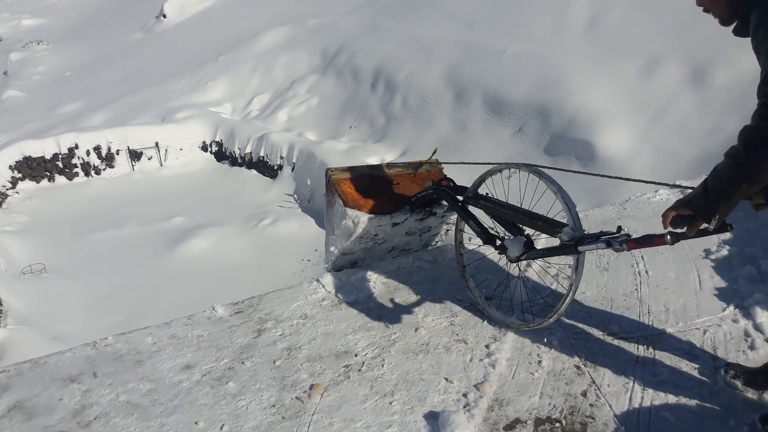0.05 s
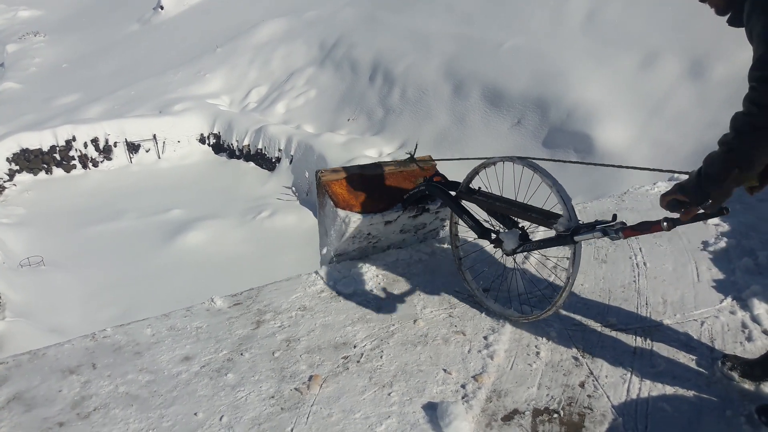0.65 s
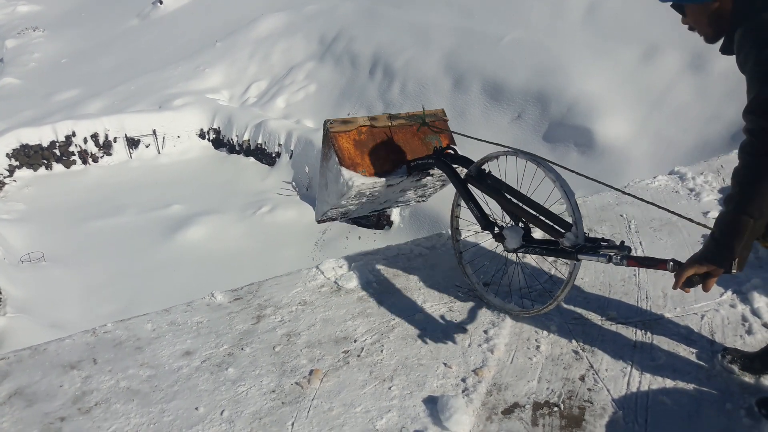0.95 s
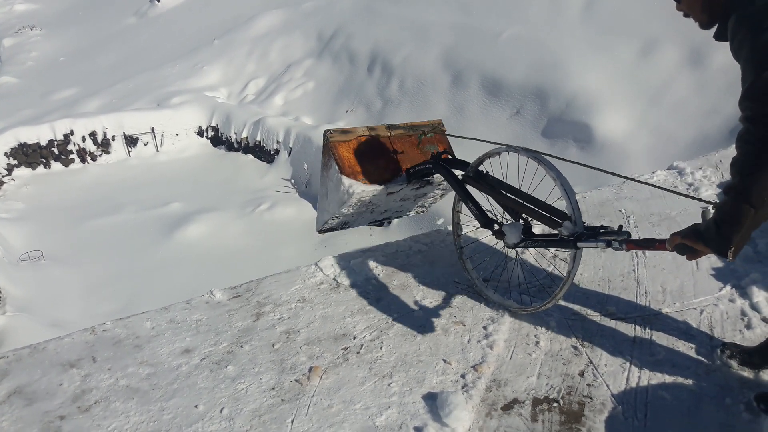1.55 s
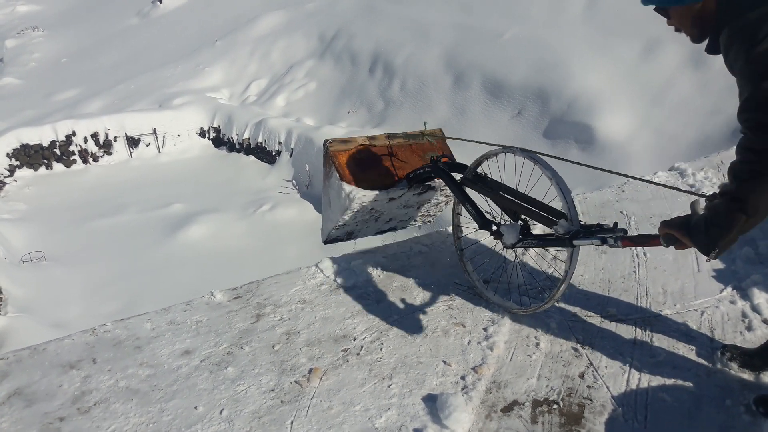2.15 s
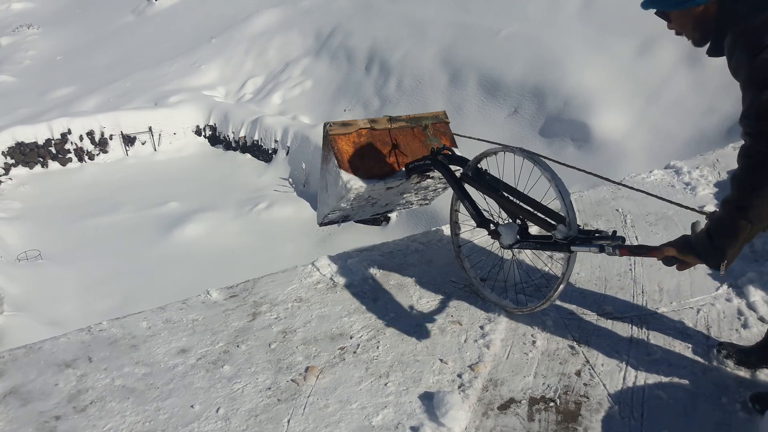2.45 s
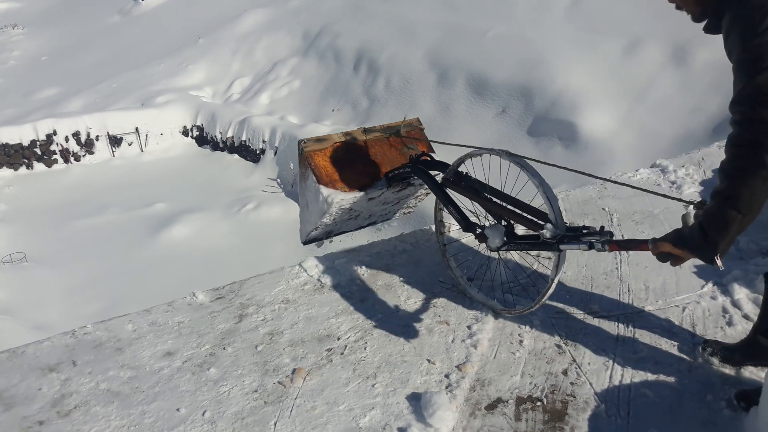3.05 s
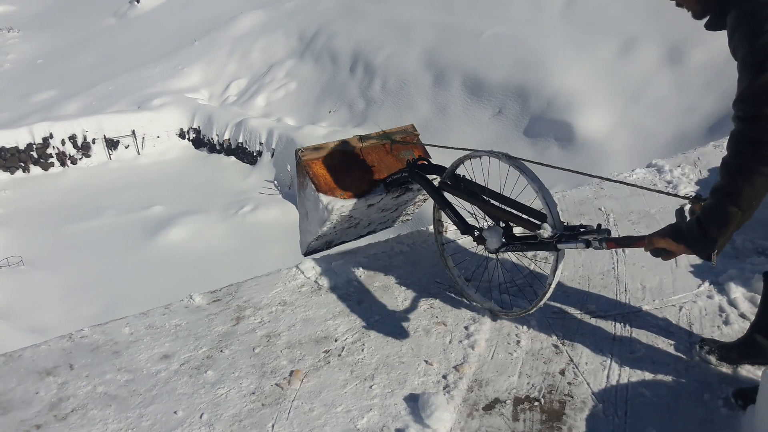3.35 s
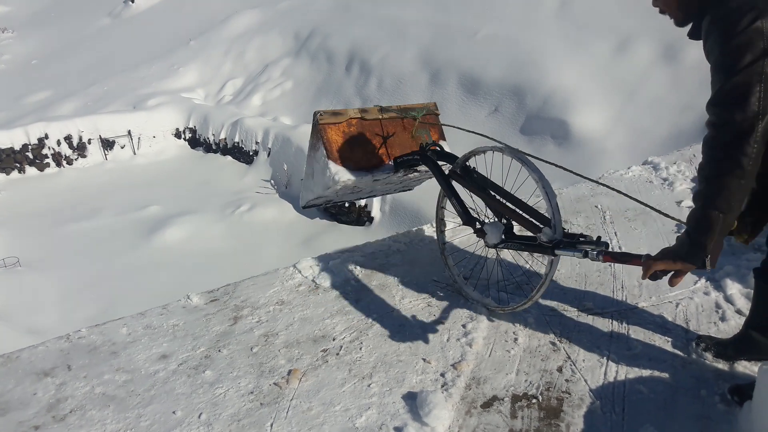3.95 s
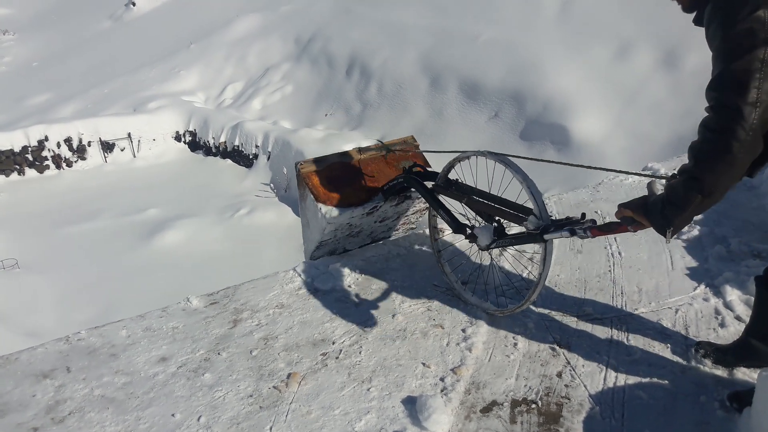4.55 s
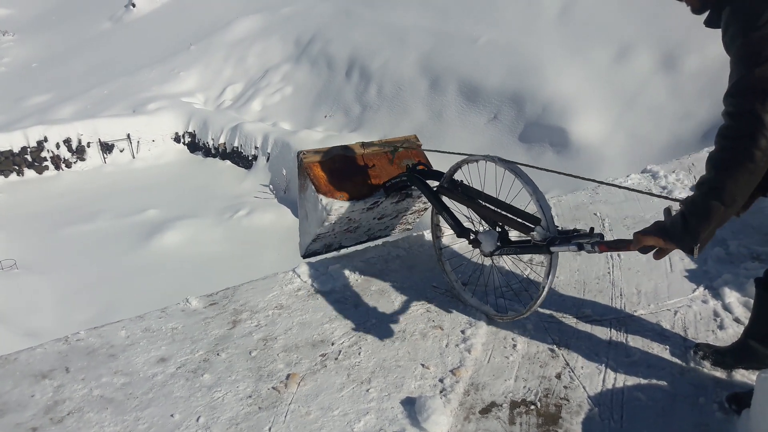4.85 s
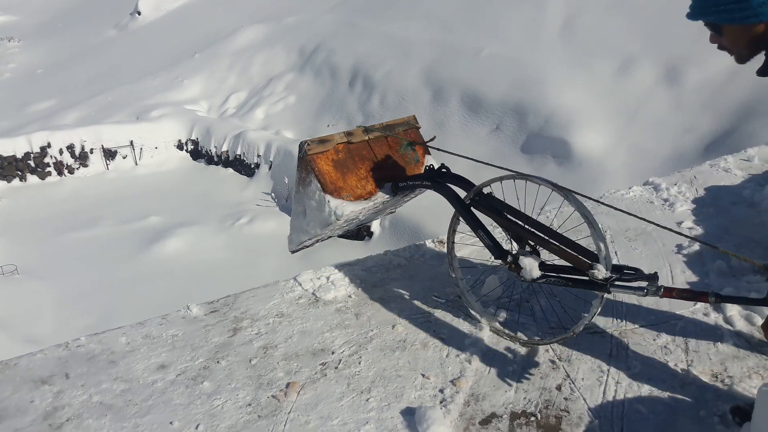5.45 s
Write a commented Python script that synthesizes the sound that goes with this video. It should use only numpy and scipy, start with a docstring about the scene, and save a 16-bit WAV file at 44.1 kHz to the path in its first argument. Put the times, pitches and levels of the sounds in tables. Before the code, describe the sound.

A sheet-metal bucket on a one-wheeled cart is jolted five times at an even pace, each a short, hollow boom and clang with crunching snow crust and a low thud. Loose steel fittings clink and the cart hisses faintly over the snow. After a faint jolt comes the hardest clang, then a soft low bump. One microphone behind the cart on a snowy roof also catches a steady, dull outdoor rush.

```python
"""On a snowy roof, one microphone behind a one-wheeled cart whose sheet-metal bucket is being shaken out.
From the first instant come five jolts, about 0.7 s apart: the snow-damped bucket booms and clangs, the
crust crunches, the cart thuds on the roof and shudders. From 1.5 s loose steel fittings clink, and soon
the cart hisses over the snow in short shoves. A faint jolt at 3.7 s leads to the hardest clang at 4.4 s.
A last low bump and glide close the scene, over the dull outdoor rush that is there throughout."""
import sys
import numpy as np
from scipy import signal
from scipy.fft import rfft, irfft, next_fast_len
from scipy.io import wavfile
from scipy.ndimage import map_coordinates

SR = 44100
rng = np.random.default_rng(int(sys.argv[2]) if len(sys.argv) > 2 else 0)


def put_to_file(sound):
    """Save the sound as 16-bit audio at rate SR, in the file named by the first command-line argument."""
    columns = np.atleast_2d(sound).T  # one column per channel
    safe = np.clip(columns, -1, 1)
    whole_steps = np.round(safe * 32767)
    wavfile.write(sys.argv[1], SR, whole_steps.astype(np.int16))


N = 251671

# jolts of the bucket: (time [s], boom [dB], clang [dB], second clang [dB], gap to second contact [s],
# gap from second to last [s], panel tilt [dB/octave], place struck [0-1])
JOLTS = [(0.0067, -7, -29, -29.5, .0126, 0.013, -4.5, 0), (0.6768, -9, -28, -44, .0121, .0167, 2.5, .33),
         (1.3915, -9, -26.5, -44, .0103, .0173, -3.5, .27),
         (2.0025, -5.5, -22.5, -33, .0181, 0.028, 0.5, 0.34),
         (2.7725, -5.5, -17, -21.5, .0129, .0039, 14.5, 0.53),
         (3.717, -31, -59, -58, 0.025, .024, -16, 0.83), (4.4476, -5, -15.5, -17.5, .0072, 0.035, -3, 0.25)]
def contacts():
    """At each jolt the bucket strikes, strikes again nearer the rim, and settles, cushioned by snow."""
    for s, boom_db, clang_db, second_db, gap, settle, tilt_db, place in JOLTS:
        rim_db = -21 + 0.66 * clang_db
        second_rim_db = -21 + 0.66 * second_db
        yield s, boom_db, clang_db, rim_db, tilt_db, place
        yield s + gap, boom_db - 0.5, second_db, second_rim_db + 5, tilt_db - 2.5, place + 0.19
        yield s + gap + settle, boom_db - 5.5, second_db - 14, second_rim_db - 2, 1, place + 0.38


# modes of the bucket's broad panels: (frequency [Hz], level [dB], t60 [s])
PANEL_MODES = [(165.5, -5, 0.12), (191.4, -6, 0.13), (210, -6, 0.22), (261.4, -4.5, 0.21), (279, -8, 0.24),
               (318.8, -7, 0.21), (364.6, -7.5, 0.16), (385, -6.5, 0.15), (434, -17.5, 0.16),
               (485, -9.5, 0.084)]
def panels(tilt_db, place):
    """A blow favours the panel modes that move most at the place where it lands."""
    lowest_hz = PANEL_MODES[0][0]
    modes = [(hz, db + tilt_db * np.log2(hz / lowest_hz) + 5 * np.cos(np.pi * k * place), t60)
             for k, (hz, db, t60) in enumerate(PANEL_MODES)]
    return ring(modes, attack=0.0013)


# modes of the bucket's walls and rim: (frequency [Hz], level [dB], t60 [s])
WALL_MODES = [(670, -10, 0.24), (696, 12.5, 0.18), (710, 6, 0.042), (799, 18, 0.16), (887, 0, .16),
              (924, 16.5, 0.091), (1003, 15, 0.21), (1140, 1.5, 0.092), (1090, -12, 0.29),
              (1130, -14.5, 0.48), (1516, -14, 0.13)]
RIM_MODES = [(1670, -14.5, 0.16), (1760, 31, 0.047), (1790, 6.5, 0.16), (1880, -29, 0.065),
             (1980, -20.5, 0.13), (2320, 30, 0.028), (2400, 7, 0.092), (2830, -21, .12), (3070, -16, .1)]
# spectra of the denser modes of panels, walls and rim: (frequency [Hz], level [dB])
BOOM_SPECTRUM = [(60, -19.5), (130, -12.5), (180, 5.5), (270, 8.5), (390, -0.5), (500, -26), (800, -43),
                 (1500, -69)]
CLANG_SPECTRUM = [(250, -52), (480, 1.5), (700, 8.5), (1000, 1), (1300, -2.5), (1600, -40), (3000, -105)]
RIM_SPECTRUM = [(800, -8.5), (1500, -9.5), (2200, -2), (2700, -13.5), (3300, -22.5), (4200, -26.5),
                (8000, -45.5), (16000, -73)]
def bucket():
    """Each contact shakes the broad panels; harder ones also bring out the stiff walls and the rim."""
    out = np.zeros(N)
    for s, boom_db, clang_db, rim_db, tilt_db, place in contacts():
        boom = amp(-13) * panels(tilt_db, place)
        boom += amp(-11.5) * burst(BOOM_SPECTRUM, attack=0.0011, t60=0.1)
        clang = amp(-15.5) * ring(WALL_MODES, attack=0.0013)
        clang += amp(-8.5) * burst(CLANG_SPECTRUM, attack=0.0012, t60=0.11)
        rim = amp(-12) * ring(RIM_MODES, attack=0.001)
        rim += amp(-3) * burst(RIM_SPECTRUM, attack=0.0018, t60=0.09)
        add(out, s, amp(boom_db) * boom + amp(clang_db) * clang + amp(rim_db) * rim)
    return out


# the cart lands on the roof: (time [s], thud [dB], thud pitch [Hz], frame ring [dB], shudder [dB])
LANDINGS = [(0.0316, -20, 95, -33.5, -35), (0.7037, -24, 108, -37.5, -36.5), (1.4149, -24, 93, -41, -32.5),
            (2.0225, -23, 101, -32, -30.5), (2.7728, -30, 124, -25.5, -29.5), (3.735, -37.5, 89, -46, -47),
            (4.459, -45, 76, -31, -28)]
# low, dull bumps of the cart, loudest as it rebounds just after a jolt: (time [s], level [dB])
CART_BUMPS = [(0.98, -41.5), (1.127, -40.5), (1.927, -38.5), (2.119, -25.5), (2.889, -22.5), (4.599, -26.5),
              (4.715, -43), (5.669, -35)]
# modes of the cart's frame: (frequency [Hz], level [dB], t60 [s])
FRAME_MODES = [(113, -11.5, 0.54), (177.8, -5.5, 0.32)]
# spectra of the roof's thud and the cart's shudder: (frequency [Hz], level [dB])
THUD_SPECTRUM = [(30, -18), (46, -15.5), (57, 11.5), (75, -20), (110, 3), (150, -25), (300, -45.5),
                 (800, -86.5)]
SHUDDER_SPECTRUM = [(30, -30), (55, -11.5), (90, 4), (112, 3), (135, 1.5), (175, 3), (290, 0), (380, -6.5),
                    (500, -18), (1000, -23.5), (2200, -33.5), (4000, -54.5), (9000, -87.5)]
def cart():
    """The roof thuds under the cart's weight; the cart rings, shudders and rebounds with dull bumps."""
    out = np.zeros(N)
    for s, thud_db, thud_hz, frame_db, shudder_db in LANDINGS:
        push = struck(np.sin(2 * np.pi * thud_hz * hit_times()) * fade(attack=0.0059, t60=0.085))
        thump = amp(-6.5) * burst(THUD_SPECTRUM, attack=0.0023, t60=0.13)
        add(out, s, amp(thud_db) * (push + thump))
        add(out, s, amp(frame_db) * ring(FRAME_MODES, attack=0.0021, scatter_db=7))
        add(out, s, amp(shudder_db) * burst(SHUDDER_SPECTRUM, attack=0.013, t60=0.49))
    for s, db in CART_BUMPS:
        add(out, s, amp(db - 9.5) * burst(SHUDDER_SPECTRUM, attack=0.0065, t60=0.25))
    return out


# throws of loose steel fittings:
# (time [s], level [dB], clack pitch [Hz], ring against chatter [dB], flight [s], change on return [dB])
THROWS = [(1.509, -36, 2120, -20, .03, -21), (2.079, -33, 2100, -20, .043, -8),
          (2.245, -24.5, 1970, -20, 0.032, -26), (2.9156, -25.5, 2230, 3, .031, -9.5),
          (4.5922, -16.5, 2210, 6.5, .04, -17)]
def fittings():
    """A fitting is thrown against its stop and drops back more softly, ringing less."""
    out = np.zeros(N)
    for s, db, clack_hz, ring_db, flight, return_db in THROWS:
        add(out, s, clink(db, clack_hz, ring_db))
        add(out, s + flight, clink(db + return_db, clack_hz, ring_db - 7.5))
    return out


# spectrum of a hollow clack: (frequency [multiples of its pitch], level [dB])
CLACK_SPECTRUM = [(.2, -24), (.45, -10), (.7, -20.5), (.88, 3), (1, 2), (1.12, -8), (1.35, -13.5),
                  (1.8, -25), (3.6, -44), (7, -58.5)]
# modes of a steel fitting: (frequency [Hz], level [dB], t60 [s])
STEEL_MODES = [(3800, -20, 0.06), (5240, -15.5, .04), (5490, -9, 0.071), (5770, -11, 0.073),
               (5935, 4, 0.063), (6460, -24, .13), (6440, 1.5, 0.055), (6700, -9, 0.062)]
# gritty spectrum of both chattering steel and breaking crust: (frequency [Hz], level [dB])
GRIT_SPECTRUM = [(800, -24), (2400, 10.5), (3500, -2.5), (4400, 0), (5500, 7.5), (6800, -4), (8000, -21.5),
                 (9500, -15), (12000, -37), (15500, -22.5)]
def clink(db, clack_hz, ring_db):
    """Loose steel parts chatter together in a hollow clack; as they spring free, a thin ring hangs on."""
    hollow = [(multiple * clack_hz, level) for multiple, level in CLACK_SPECTRUM]
    clack = burst(hollow, attack=0.0016, t60=0.022)
    steel = amp(ring_db - 2) * ring(STEEL_MODES, attack=0.00047, scatter_db=13)
    chatter = burst(GRIT_SPECTRUM, attack=0.00052, t60=0.053)
    return amp(db - 15.5) * clack + amp(0.73 * db - 31) * (chatter + steel)


# spectrum of snapping ice crystals: (frequency [Hz], level [dB])
CRACKLE_SPECTRUM = [(1500, -4.5), (3500, -5), (5000, 11), (7000, 1.5), (8000, -9.5), (9800, -4.5),
                    (12000, -18.5), (15500, -22)]
def crackle(rate, spread_db):
    """Single ice crystals snap, rate a second, in widely different sizes."""
    size = SR // 2
    snaps = (rng.random(size) < rate / SR) * rng.choice([-1, 1], size)
    return colour(snaps * amp(spread_db * rng.random(size)), CRACKLE_SPECTRUM)


# the bucket's lip breaks the crust: (time [s], level [dB], loss per further break [dB], crackle [dB])
CRUNCHES = [(.0094, -37, 0.2, -50.5), (0.6803, -35.5, 2.5, -63), (1.3935, -36, -0.5, -57),
            (2.0018, -42, -3.5, -55), (2.7764, -25, 7.5, -87), (4.4586, -35.5, 11, -64)]
# sharp cracks in the ice, and short bright scrapes of metal on it: (time [s], level [dB])
ICE_CRACKS = [(0.0372, -32), (0.088, -44), (0.178, -57), (0.9874, -54), (1.3194, -60), (2.0154, -35),
              (2.0254, -41), (2.86, -49), (3.7723, -57), (3.8905, -52)]
ICE_SCRAPES = [(0.035, -38.5), (1.458, -45.5), (2.785, -32), (3.0755, -50.5), (3.89, -46.5), (4.125, -45),
               (4.168, -46.5), (4.459, -24), (4.485, -28), (4.7242, -53)]
# spectra of cracking ice and of sliding on ice or snow: (frequency [Hz], level [dB])
CRACK_SPECTRUM = [(1000, -16.5), (2400, -10), (3500, -17.5), (4600, 6), (5300, 4.5), (7000, -7.5),
                  (8200, -17), (10500, -17), (15500, -25.5)]
SLIDE_SPECTRUM = [(3500, -45), (4700, -27), (5400, 2.5), (6000, 11.5), (6700, 5.5), (7300, -7),
                  (8000, -36.5), (10000, -33), (15000, -18.5)]
def crust():
    """The snow crust gives way in four quick showers of grains; ice cracks and metal scrapes over it."""
    out = np.zeros(N)
    break_gap_s = 0.0235
    for s, db, loss_db, crackle_db in CRUNCHES:
        for k in range(4):
            shower = grains(GRIT_SPECTRUM, size=SR // 2, rate=580, spread_db=3.5)
            shower = amp(db - 18.5 - k * loss_db) * struck(shower * fade(attack=0.00072, t60=0.08))
            snaps = crackle(rate=570, spread_db=28)
            snaps = amp(crackle_db - 3 * k) * struck(snaps * fade(attack=0.0006, t60=0.085))
            add(out, s + k * break_gap_s, shower + snaps)
    for s, db in ICE_CRACKS:
        add(out, s, amp(db - 16.5) * burst(CRACK_SPECTRUM, attack=0.00056, t60=0.026))
    for s, db in ICE_SCRAPES:
        scrape = grains(SLIDE_SPECTRUM, size=SR // 2, rate=520, spread_db=3.5)
        add(out, s, amp(db - 16) * struck(scrape * fade(attack=0.00083, t60=0.081)))
    return out


# the cart glides over packed snow: (time of top speed [s], level [dB], rise [s], fall [s])
GLIDES = [(2.19, -68.5, 0.085, 0.13), (2.94, -64, .11, 0.085), (3.96, -64.5, 0.13, 0.14),
          (4.6, -65, 0.11, 0.082), (5.7, -66.5, 0.15, .1)]
# spectrum of sifting powder: (frequency [Hz], level [dB])
POWDER_SPECTRUM = [(2500, -15.5), (3800, 2.5), (4600, 0.5), (5400, 5.5), (6300, -18), (7300, -7),
                   (8500, -18), (12000, -8), (15500, -20)]
def loose_snow():
    """Crystals hiss as the cart gathers and loses speed; powder sifts with each glide and crunch."""
    t = np.arange(N) / SR
    powder_rise_s, powder_t60_s = 0.04, 0.99
    glide = sum(amp(db) * np.exp(np.minimum((t - s) / rise, (s - t) / fall))
                for s, db, rise, fall in GLIDES)
    powder = amp(-87) + amp(-15) * glide
    for s, db, loss_db, _ in CRUNCHES:
        age = np.maximum(t - s, 0)
        sift_db = db - 29 - 2 * loss_db  # more powder the longer the crust keeps breaking
        powder += amp(sift_db - 60 * age / powder_t60_s) * (1 - np.exp(-age / powder_rise_s))
    hiss = np.hypot(glide, amp(-87.5)) * grains(SLIDE_SPECTRUM, size=N, rate=240, spread_db=4.5)
    return hiss + powder * grains(POWDER_SPECTRUM, size=N, rate=270, spread_db=5.5)


# spectra of the rush and thin hiss all around the roof: (frequency [Hz], level [dB])
RUSH_SPECTRUM = [(15, -31.5), (25, -3), (82, -4.5), (193, -0.5), (221, 0), (336, -3.5), (369, -3.5),
                 (655, -6.5), (763, -6.5), (941, -8.5), (2400, -17), (3120, -45), (5280, -120)]
AIR_SPECTRUM = [(1500, -31), (2000, 0), (2400, -3.5), (2800, -6), (3200, -13.5), (3800, -25), (5000, -30),
                (6300, -36), (8000, -40), (11000, -33.5), (15500, -28)]
def outdoors():
    """The open-air ambience: a steady dull rush, with a little thin hiss above it."""
    rush = noise(RUSH_SPECTRUM, N) * amp(-46 + 0.34 * wobble(5.9, N))
    return rush + amp(-64) * noise(AIR_SPECTRUM, N)


def ring(modes, attack, scatter_db=3):
    """Decaying modes, at new strengths for each blow; neighbours swing in opposite directions."""
    t = hit_times()
    scatter = scatter_db * rng.standard_normal(len(modes))
    return struck(sum((-1) ** k * amp(db + scatter[k]) * np.sin(2 * np.pi * hz * t) * fade(attack, t60)
                      for k, (hz, db, t60) in enumerate(modes)))


def burst(spectrum, attack, t60):
    """Modes too dense to tell apart, dying together."""
    return struck(noise(spectrum, SR // 2) * fade(attack, t60))


def grains(spectrum, size, rate, spread_db):
    """Tiny cracks that come in clumps, rate clumps a second."""
    clumps = amp(spread_db * np.tanh(wobble(rate, size)))
    return colour(rng.standard_normal(size) * clumps, spectrum)


def noise(spectrum, size):
    """Coloured noise of rms 1."""
    return colour(rng.standard_normal(size), spectrum)


def colour(x, spectrum):
    """x through a curve of (frequency [Hz], level [dB]) points, at rms 1."""
    points_hz, points_db = np.transpose(spectrum)
    size = next_fast_len(len(x))
    hz = np.fft.rfftfreq(size, 1 / SR)
    gain = amp(np.interp(np.log(hz + 1), np.log(points_hz), points_db))
    shaped = irfft(rfft(x, size) * gain, size)[:len(x)]
    return shaped / rms(shaped)


def wobble(rate, size):
    """A smooth random curve, rate knots a second."""
    knots = rng.standard_normal(int(size * rate / SR) + 4)
    return map_coordinates(knots, [np.arange(size) * rate / SR])


def fade(attack, t60):
    """A rise, then an exponential decay; both times in seconds."""
    t = hit_times()
    return (1 - np.exp(-t / attack)) * amp(-60 * t / t60)


def hit_times():
    """Times over the half second that a hit lasts."""
    return np.arange(SR // 2) / SR


def struck(x):
    """x with rms 1 over its first 20 ms."""
    return x / rms(x[:SR // 50])


def rms(x):
    """Root mean square, kept above zero."""
    return np.sqrt(np.mean(x ** 2) + 1e-20)


def amp(db):
    """Decibels to gain."""
    return 10 ** (np.asarray(db) / 20)


def add(track, s, sound):
    """Mix a sound into the track from time s."""
    start = max(round(s * SR), 0)
    track[start:start + len(sound)] += sound[:max(N - start, 0)]


def scene():
    """Everything heard in mono from one spot on the roof, behind the cart."""
    return (bucket() + cart() + fittings() + crust() + loose_snow() + outdoors())[None]


def record(dry):
    """The microphone cuts the deepest bass and passes nothing above its band limit."""
    low_cut_hz, top_hz = 54, 15830
    thin = signal.sosfilt(signal.butter(4, low_cut_hz, "highpass", fs=SR, output="sos"), dry)
    size = next_fast_len(N + SR // 2)
    in_band = np.fft.rfftfreq(size, 1 / SR) < top_hz
    return irfft(rfft(thin, size) * in_band, size)[..., :N]


dry = scene()
out = record(dry)
put_to_file(out)
```